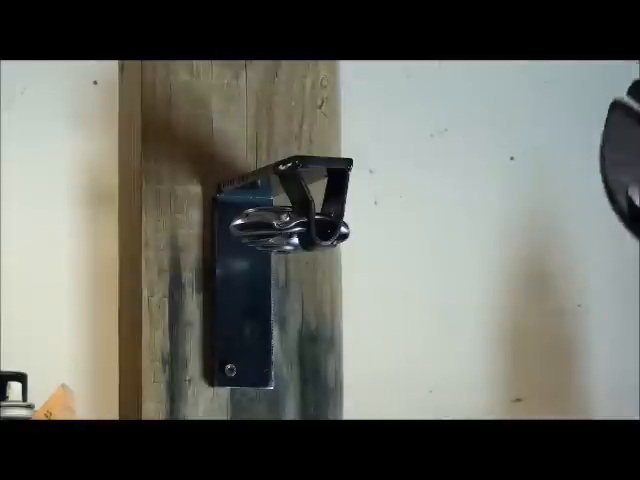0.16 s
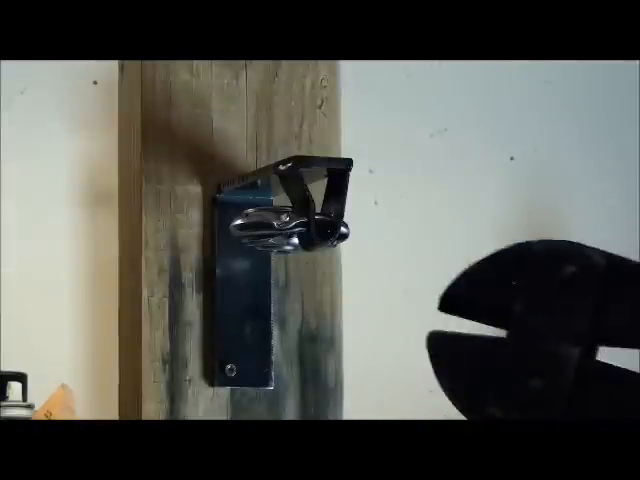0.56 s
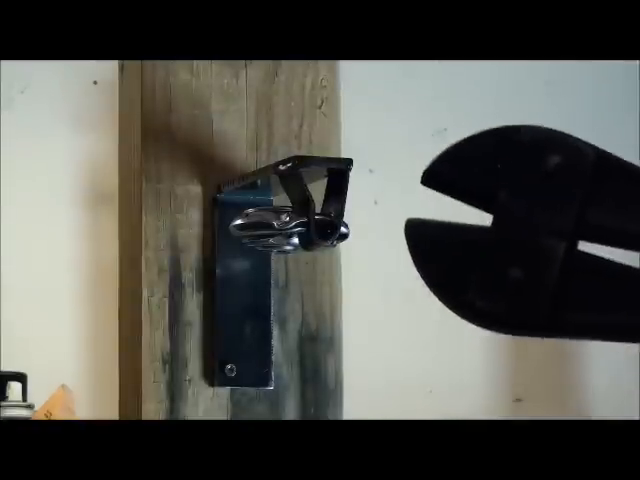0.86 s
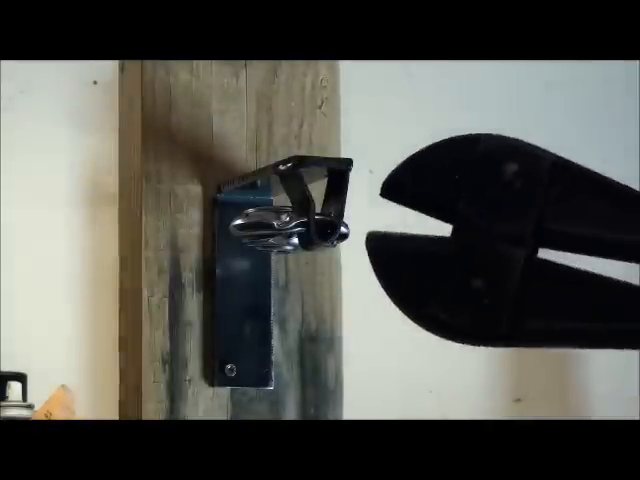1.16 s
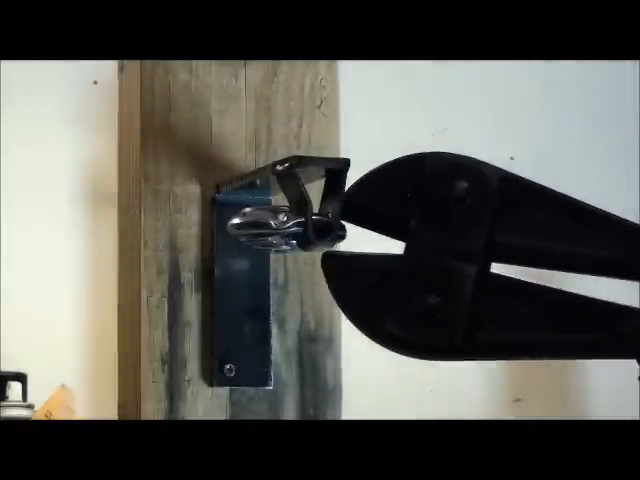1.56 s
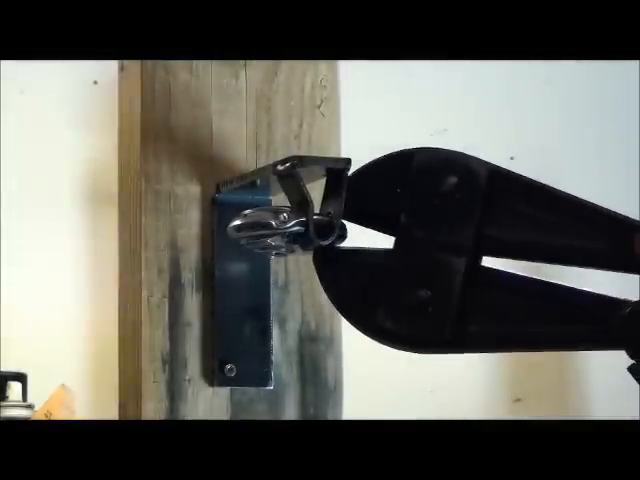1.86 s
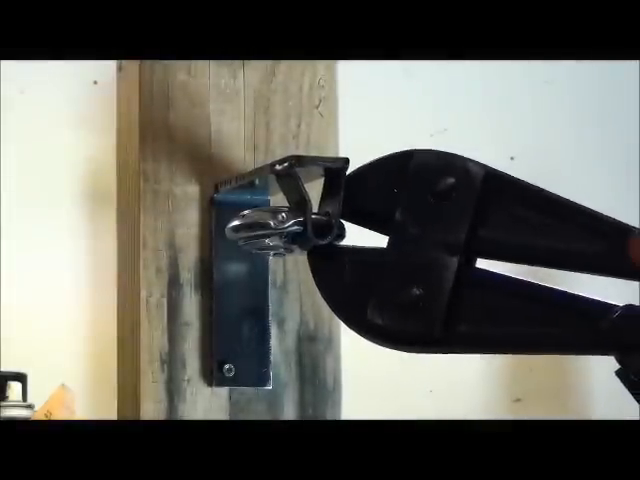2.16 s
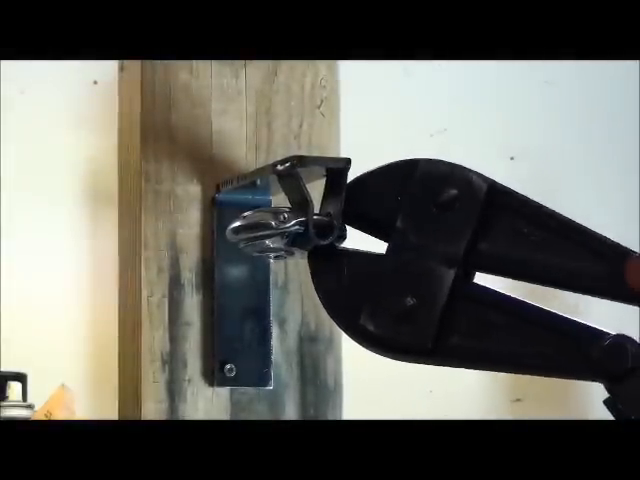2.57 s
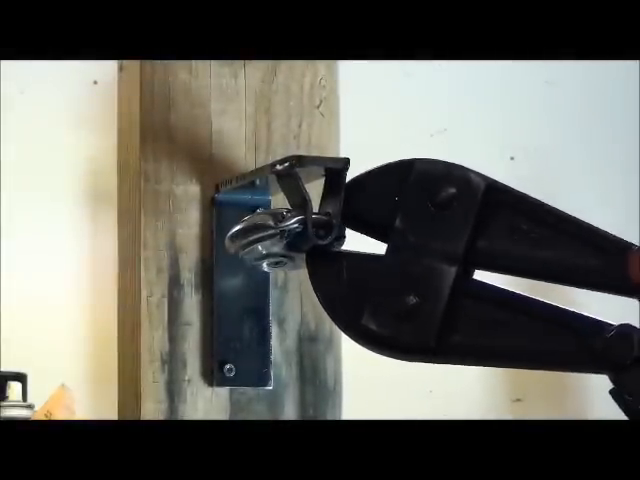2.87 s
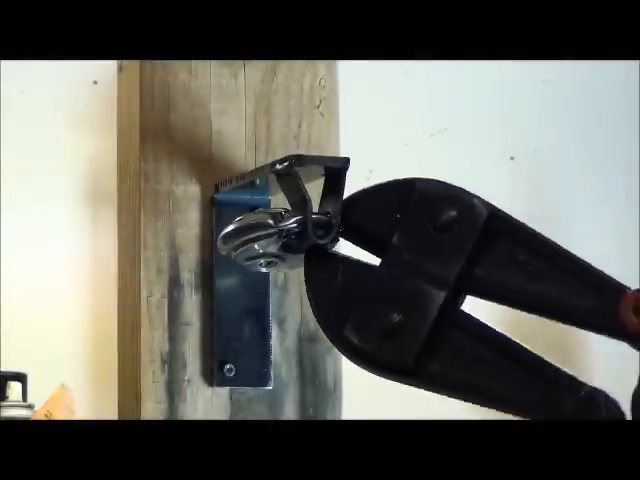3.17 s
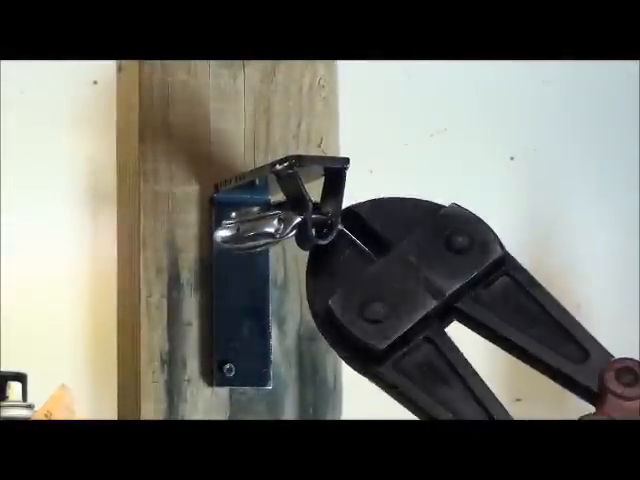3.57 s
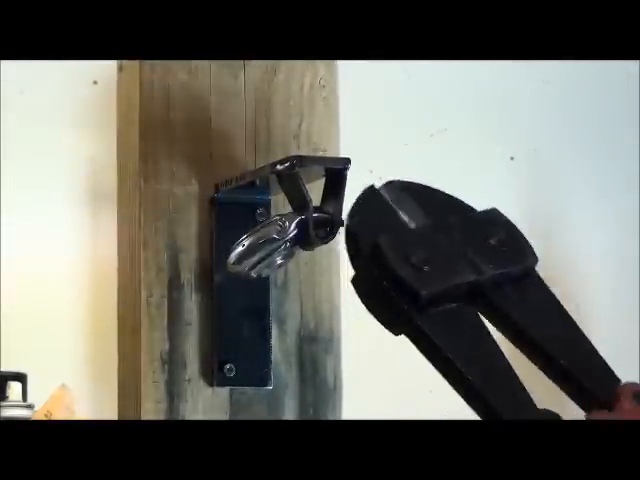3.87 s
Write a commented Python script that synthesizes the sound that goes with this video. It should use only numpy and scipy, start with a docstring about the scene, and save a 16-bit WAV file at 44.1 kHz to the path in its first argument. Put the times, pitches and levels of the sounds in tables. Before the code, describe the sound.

After a brief cloth rustle and a quiet pause, steel jaws clatter against a padlock, grind and scrape, then strike hardest near the end; close stereo pickup, centred, hard reflective surroundings, faint wide air.

```python
"""Bolt cutters on a padlock

Heavy bolt cutters are worked onto a padlock in a steel hasp on a wooden post, straight ahead, close to hard walls.
A sleeve rustles as the tool is lifted: coloured noise. Then jaws knock, slip and scrape in clattering bouts:
each contact is a dull knock, a clank and a bright tick, made of noise bursts and ringing modes.
The walls answer with dense, decaying reflections, and quiet, wide air lies behind it all."""
import sys
import numpy as np
from scipy import signal
from scipy.fft import rfft, irfft
from scipy.io import wavfile

SR = 44100
rng = np.random.default_rng(int(sys.argv[2]) if len(sys.argv) > 2 else 0)


def pcm_store(signal):
    """Save signal as 16-bit PCM."""
    levels = np.round(np.clip(np.atleast_2d(signal), -1, 1) * 32767)
    wavfile.write(sys.argv[1], SR, levels.astype(np.int16).T)


N = 176400
T = np.arange(N) / SR   # time [s]

# Colours are relative: each noise is brought to rms 1 before its own level is applied.
# background air: (frequency [Hz], relative density [dB])
AIR_COLOUR = [(24, -43), (40, -3.5), (229, -8), (260, -3), (562, -14), (15500, -32.5)]
# air comes from all round: (frequency [Hz], gain of the side signal [dB])
AIR_WIDTH = [(60, -10.5), (700, 4.5), (4500, -1.5), (12000, -12.5)]
AIR_DB = -57

# sleeve, its rub and its high swish: (time [s], level [dB])
RUB_LEVEL = [(0, -66), (.22, -57), (.27, -50), (.305, -51.5), (.385, -40.5), (.55, -60), (1.05, -93),
             (1.23, -63), (1.65, -97)]
SWISH_LEVEL = [(.06, -86), (.105, -55.5), (.15, -64), (.21, -53), (.39, -55.5), (.56, -77), (2.4, -65.5),
               (3.3, -62)]
# colour of rub and swish: (frequency [Hz], relative density [dB])
RUB_COLOUR = [(450, -10.5), (950, 0.5), (3200, 2.5), (5000, -6), (8500, -2.5), (14000, -27)]
SWISH_COLOUR = [(3000, -34), (6500, -1.5), (8500, 3.5), (16000, -11)]

# post under the weight of the tool: (time [s], level [dB])
STRAIN_LEVEL = [(1.65, -75), (1.85, -56.5), (3.35, -52), (3.55, -33), (3.76, -49.5), (4, -42)]
# its rumble: (frequency [Hz], relative density [dB])
RUMBLE_COLOUR = [(45, -13.5), (135, -14), (300, -16.5)]

# jaws meet the lock: (time [s], knock [dB], clank [dB], tick [dB])
CONTACTS = [(1.680, -29, -31.5, -31.5), (1.707, -24, -37, -34.5), (1.775, -23, -35, -48.5),
            (1.783, -18, -49, -47), (1.819, -39, -28.5, -37.5), (1.828, -21, -47, -60),
            (2.128, -38.5, -42.5, -49.5), (2.154, -38.5, -43.5, -45.5), (2.227, -24, -39, -54),
            (2.273, -22.5, -25.5, -33.5), (2.279, -21, -33, -44), (2.552, -51, -47.5, -45),
            (2.765, -40, -36, -50.5), (2.841, -30, -38, -44.5), (2.850, -24, -31.5, -36),
            (2.905, -22.5, -55, -55), (2.919, -29.5, -31.5, -34.5), (3.114, -41.5, -42.5, -59),
            (3.212, -36, -46, -63), (3.444, -17.5, -31.5, -30), (3.458, -31, -35, -28),
            (3.482, -21.5, -26.5, -29), (3.491, -18, -32, -22.5), (3.5, -22.5, -47, -38),
            (3.533, -21, -29.5, -30.5), (3.640, -23, -39.5, -63), (3.851, -19, -34, -35),
            (3.863, -23.5, -29, -22.5), (3.870, -15.5, -27.5, -33), (3.894, -22.5, -25.5, -42)]
CONTACT_S, KNOCK_DB, CLANK_DB, TICK_DB = np.transpose(CONTACTS)
# colour of each part of a contact: (frequency [Hz], relative density [dB])
KNOCK_COLOUR = [(110, -12), (190, -15), (290, -2.5), (700, -3.5), (1150, -3.5), (1500, -18), (2500, -28.5)]
CLANK_COLOUR = [(800, -21), (1850, 6), (3500, -7.5), (8000, -27.5)]
TICK_COLOUR = [(1500, -26), (3000, 0), (7500, 3), (9800, -0.5), (12000, -11), (16000, -22)]
KNOCK_T60_S, CLANK_T60_S, TICK_T60_S = 0.053, 0.057, 0.061
KNOCK_RISE_S, CLANK_RISE_S, TICK_RISE_S = 0.009, 0.004, 0.00078   # time constants

# steel of shackle and jaws: (frequency [Hz], relative level [dB])
SHACKLE_MODES = [(6150, -31.5), (6560, -29), (7600, -33.5), (7950, -27.5), (8440, -39)]
SHACKLE_T60_S = 0.04
FIRST_TOUCH_S, SHACKLE_OVER_TICK_DB = 1.679, 20.5
# hasp and post ring: (frequency [Hz], relative level [dB], T60 [s])
HASP_MODES = [(126.3, -15, 0.67), (292.2, -9, 0.59), (336, -11, 0.38), (444.5, -0.5, 0.36), (537, -8, 0.49),
              (669.3, -6.5, 0.34), (707, -2.5, 0.36), (794, -8.5, 0.72), (1064, 0.5, 0.23),
              (1218, -10, 0.29)]
HASP_OVER_KNOCK_DB, HASP_LAG_S = -8, 0.004007
STRIKE_SPREAD_DB = 3

# jaws creak as they bite: (time of the height [s], level [dB])
CREAKS = [(1.72, -34.5), (1.762, -40.5), (3.228, -41.5), (3.27, -40.5), (3.838, -52)]
# colour of the creak: (frequency [Hz], relative density [dB])
CREAK_COLOUR = [(2400, -8), (2780, 7), (4000, -12), (5210, -9)]
# lock shoved round in the hasp: (time of the height [s], level [dB])
SHOVES = [(2.13, -46.5), (2.215, -47.5), (2.787, -38), (3.262, -36), (3.395, -42), (3.841, -31)]
# colour of its dull grind: (frequency [Hz], relative density [dB])
SHOVE_COLOUR = [(140, -5), (330, -1), (1100, -7.5), (2200, -19)]
CREAK_WIDTH_S, SHOVE_WIDTH_S = 0.0076, 0.027   # standard deviations of the swells
# jaws slide on the shackle: (time [s], level [dB])
SLIDE_LEVEL = [(3.1, -64), (3.43, -56), (3.47, -35.5), (3.54, -38), (3.68, -61.5), (3.8, -63), (3.9, -45),
               (4, -58)]
SLIPS_PER_S = 1800

# walls: (frequency [Hz], T60 [s])
ROOM_T60 = [(100, 0.59), (4000, 0.51), (12000, 0.3)]
ROOM_BUILD_S = 0.0085
KNOCK_ROOM_DB, CLANK_ROOM_DB, TICK_ROOM_DB = 0.5, 1, -4

# tool, sleeve, post and walls: (frequency [Hz], gain of the side signal [dB])
NEAR_WIDTH = [(150, -21.5), (700, -9.5), (2500, -7.5), (8000, -4.5), (12000, -22)]
DIRECT_SIDE_DB, SLEEVE_SIDE_DB = -9, -3.5   # before NEAR_WIDTH acts
PAN_DB, CUTOFF_HZ = -0.33, 15700


def from_db(db):
    """Decibels to gain."""
    return 10 ** (np.asarray(db) / 20)


def level(curve):
    """Gain along a (time [s], level [dB]) curve, practically silent outside it."""
    return from_db(np.interp(T, *np.transpose(curve), left=-150, right=-150))


def at_hz(points, hz):
    """Reads a table on a log-frequency axis."""
    table_hz, values = np.transpose(points)
    return np.interp(np.log(hz + 1e-9), np.log(table_hz), values)


def coloured(x, spectrum):
    """Gives x a spectrum that falls away beyond the ends of the table; rms 1."""
    hz = np.arange(N // 2 + 1) * SR / N + 1e-3
    low_skirt = np.minimum(hz / spectrum[0][0], 1) ** 2
    high_skirt = np.minimum(spectrum[-1][0] / hz, 1) ** 2
    y = irfft(rfft(x) * from_db(at_hz(spectrum, hz)) * low_skirt * high_skirt, N)
    return y / np.std(y)


def stereo(pair, side_db):
    """Mid and side to left and right."""
    mid, side = pair
    return mid + from_db(side_db) * side * np.array([[1], [-1]])


def noise(spectrum, side_db=0):
    """Coloured stereo noise from independent mid and side."""
    return stereo(coloured(rng.standard_normal((2, N)), spectrum), side_db)


def imaged(x, width):
    """Scales the side signal at each frequency, which sets the stereo width."""
    hz = np.arange(N // 2 + 1) * SR / N
    side = irfft(rfft((x[0] - x[1]) / 2) * from_db(at_hz(width, hz)), N)
    return stereo([x.mean(axis=0), side], 0)


def clicks(times, gains):
    """One impulse per contact, over a tiny offset that keeps the filters from underflow."""
    return np.bincount((np.asarray(times) * SR).astype(int), gains, N)[:N] + 1e-18


def burst(times, db, spectrum, rise_s, t60):
    """Crowded, quickly damped modes: a short noise burst at each contact."""
    fall = np.exp(-np.log(1e6) / (t60 * SR))   # power falls 60 dB in t60
    rise = np.exp(-1 / (rise_s * SR))
    power = signal.lfilter([1 - rise], np.poly([fall, rise]), clicks(times, from_db(db) ** 2))
    return np.sqrt(2 * np.abs(power)) * noise(spectrum, DIRECT_SIDE_DB)


def ring(times, db, modes):
    """Damped resonators: every contact strikes each mode with a strength of its own."""
    out = np.zeros(N)
    for hz, mode_db, t60 in modes:
        radius = from_db(-60 / (t60 * SR))
        angle = 2 * np.pi * hz / SR
        spread_db = STRIKE_SPREAD_DB * rng.standard_normal(len(times))
        strikes = clicks(times, from_db(db + mode_db + spread_db))
        poles = [1, -2 * radius * np.cos(angle), radius * radius]
        out += signal.lfilter([0, np.sin(angle)], poles, strikes)
    return out


def swells(rows, width_s):
    """A smooth rise and fall round each (time [s], level [dB])."""
    return sum(from_db(db) * np.exp(-.5 * ((T - s) / width_s) ** 2) for s, db in rows)


def slips(spectrum):
    """Steel slips on steel in tiny uneven jumps: random sparse impulses, coloured."""
    happens = rng.random(N) < SLIPS_PER_S / SR
    return coloured(happens * rng.standard_normal(N), spectrum)


def air():
    """Quiet, steady background noise from all round."""
    return from_db(AIR_DB) * imaged(noise(AIR_COLOUR), AIR_WIDTH)


def sleeve():
    """Cloth rubs and swishes as the tool is raised, and faintly as the handles are worked."""
    rub = level(RUB_LEVEL) * noise(RUB_COLOUR, SLEEVE_SIDE_DB)
    swish = level(SWISH_LEVEL) * noise(SWISH_COLOUR, SLEEVE_SIDE_DB)
    return rub + swish


def post_rumble():
    """Low noise of the post, swelling with the strain of the tool's weight."""
    return level(STRAIN_LEVEL) * noise(RUMBLE_COLOUR, DIRECT_SIDE_DB)


def knocks():
    """Dull, slow-rising bursts of hasp and post."""
    return burst(CONTACT_S, KNOCK_DB, KNOCK_COLOUR, KNOCK_RISE_S, KNOCK_T60_S)


def clanks():
    """Bursts of the lock body in the middle range."""
    return burst(CONTACT_S, CLANK_DB, CLANK_COLOUR, CLANK_RISE_S, CLANK_T60_S)


def ticks():
    """Bright, sharp bursts of steel on steel."""
    return burst(CONTACT_S, TICK_DB, TICK_COLOUR, TICK_RISE_S, TICK_T60_S)


def shackle_ring():
    """Shackle and jaws ring briefly, most at the first clean touch."""
    modes = [(hz, db, SHACKLE_T60_S) for hz, db in SHACKLE_MODES]
    first = ring([FIRST_TOUCH_S], 0, modes)
    return first + ring(CONTACT_S, TICK_DB + SHACKLE_OVER_TICK_DB, modes)


def hasp_ring():
    """Modes of hasp and post, struck a little after each knock begins."""
    return ring(CONTACT_S + HASP_LAG_S, KNOCK_DB + HASP_OVER_KNOCK_DB, HASP_MODES)


def wall_response():
    """Dense reflections that build up and die band by band; unit mean energy."""
    t, hz = T[:SR], np.arange(SR // 2 + 1)   # one second
    white = rfft(rng.standard_normal((2, SR)))
    out = 0
    edges = np.append(0, np.geomspace(90, SR / 2, 12))
    for low, high in zip(edges, edges[1:]):
        band = stereo(irfft(white * ((hz >= low) & (hz < high)), SR), 0)
        t60 = at_hz(ROOM_T60, (low + high) / 2)
        out = out + band * np.exp(-np.log(1000) * t / t60)
    out = out * (1 - np.exp(-t / ROOM_BUILD_S))
    return out / np.sqrt(np.sum(out ** 2) / 2)


def walls(dull, middle, bright):
    """The hard walls answer the mono sum of the three parts of the clatter."""
    sent = from_db(KNOCK_ROOM_DB) * dull + from_db(CLANK_ROOM_DB) * middle + from_db(TICK_ROOM_DB) * bright
    return signal.fftconvolve(sent.mean(axis=0)[None], wall_response(), axes=1)[:, :N]


def creaks():
    """The biting jaws creak: short swells of stick and slip."""
    return swells(CREAKS, CREAK_WIDTH_S) * slips(CREAK_COLOUR)


def shoves():
    """The lock grinds dully as it shifts in the hasp: swells of low noise."""
    return swells(SHOVES, SHOVE_WIDTH_S) * noise(SHOVE_COLOUR, DIRECT_SIDE_DB)


def slide():
    """The jaws scrape along the shackle in a bright run of slips."""
    return level(SLIDE_LEVEL) * slips(TICK_COLOUR)


def scene():
    """Tool, sleeve and rumbling post straight ahead, with the walls, in quiet, wide air."""
    dull = knocks() + shoves() + creaks()
    middle = clanks()
    bright = ticks() + shackle_ring() + slide()
    clatter = dull + middle + bright + hasp_ring() + walls(dull, middle, bright)
    near = sleeve() + post_rumble() + clatter
    return imaged(near, NEAR_WIDTH) + air()


def record(dry):
    """The stereo image leans a little to the right; the top is cut steeply."""
    pair = dry * from_db([[PAN_DB], [-PAN_DB]])
    # 0.1 dB passband ripple, 80 dB stopband
    top_cut = signal.ellip(10, .1, 80, CUTOFF_HZ, fs=SR, output="sos")
    return signal.sosfilt(top_cut, pair)


dry = scene()
out = record(dry)
pcm_store(out)
```